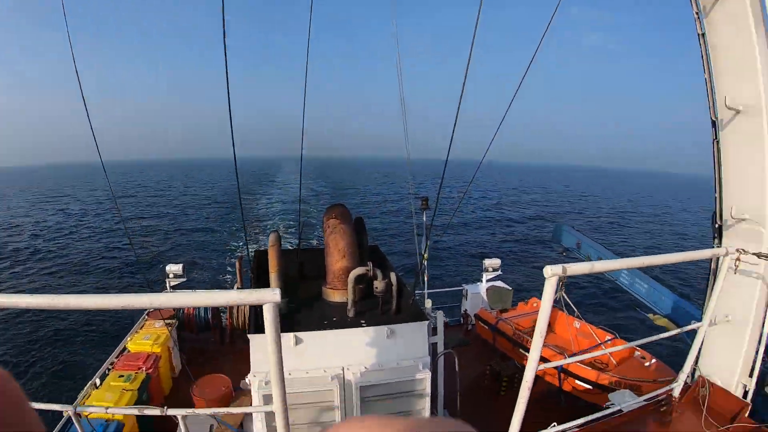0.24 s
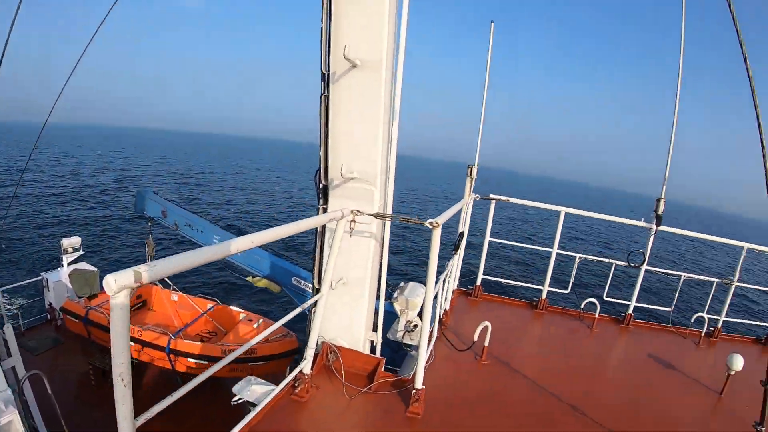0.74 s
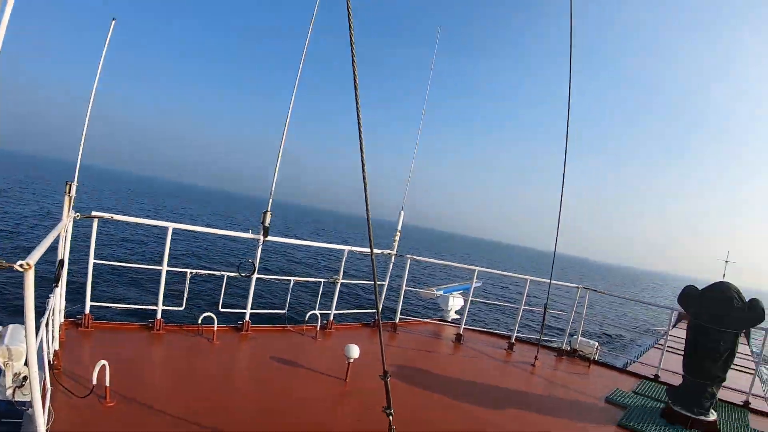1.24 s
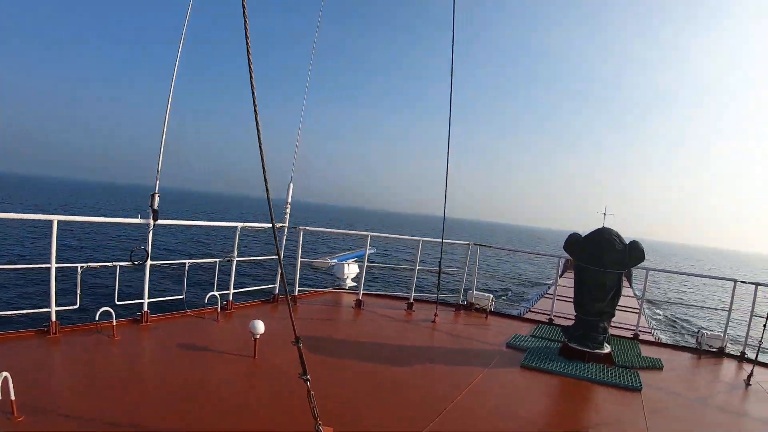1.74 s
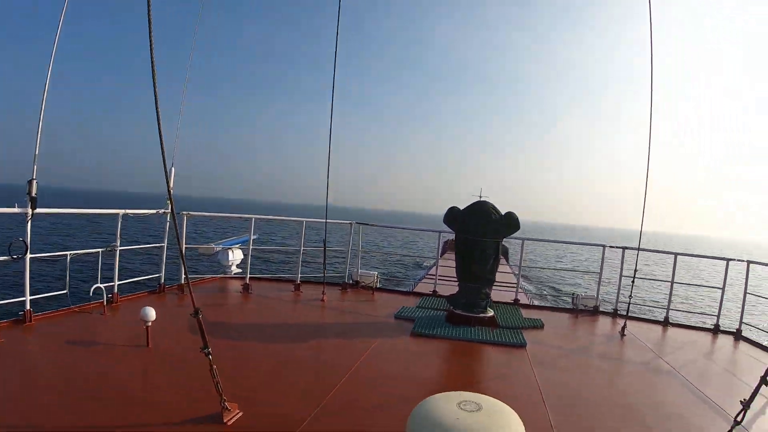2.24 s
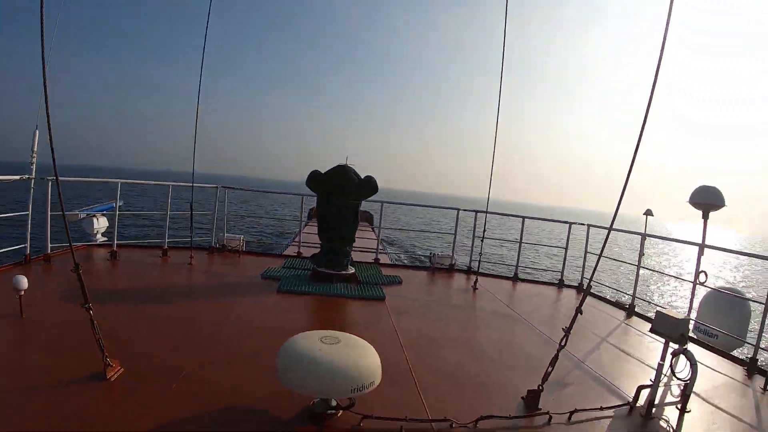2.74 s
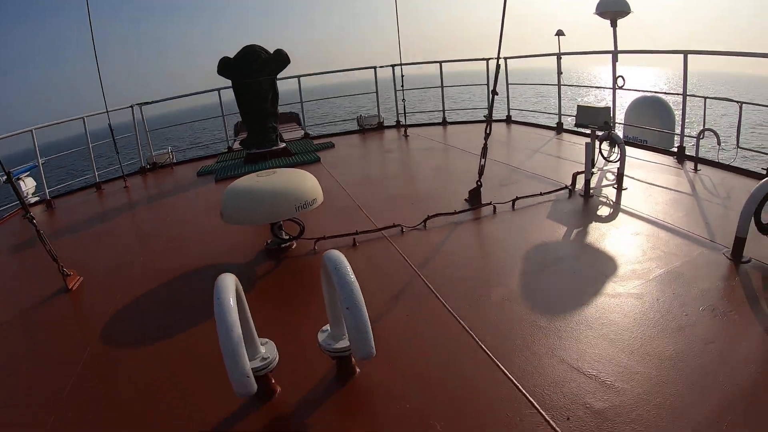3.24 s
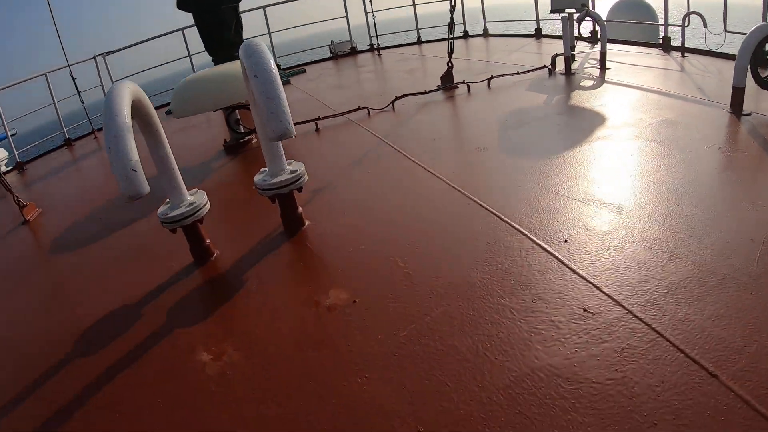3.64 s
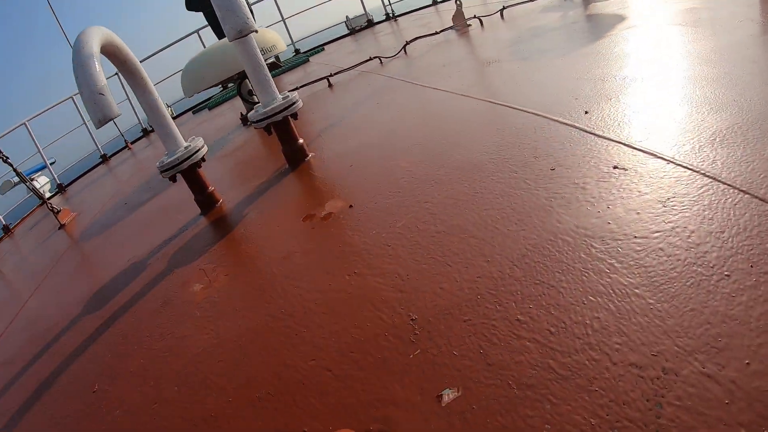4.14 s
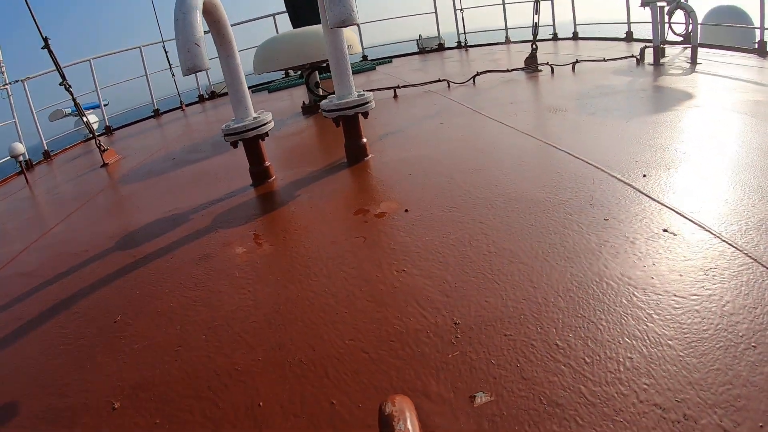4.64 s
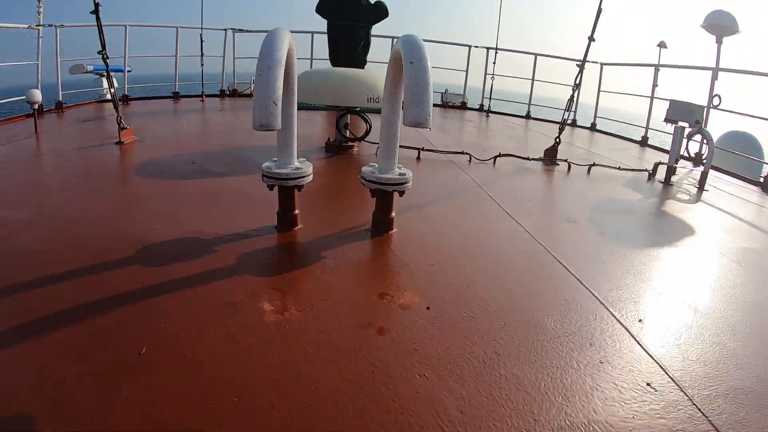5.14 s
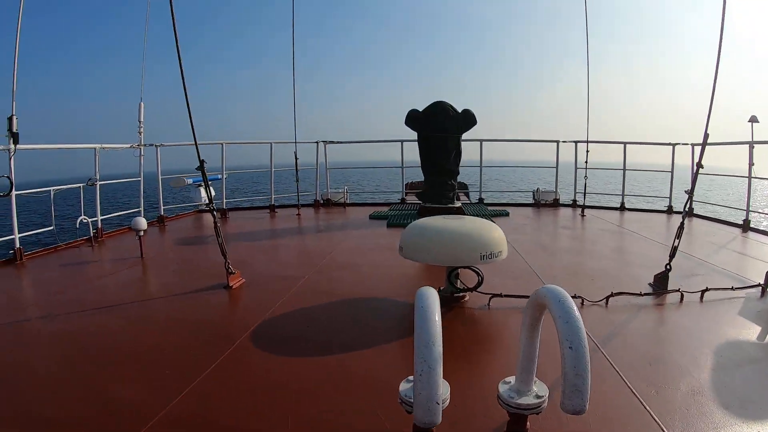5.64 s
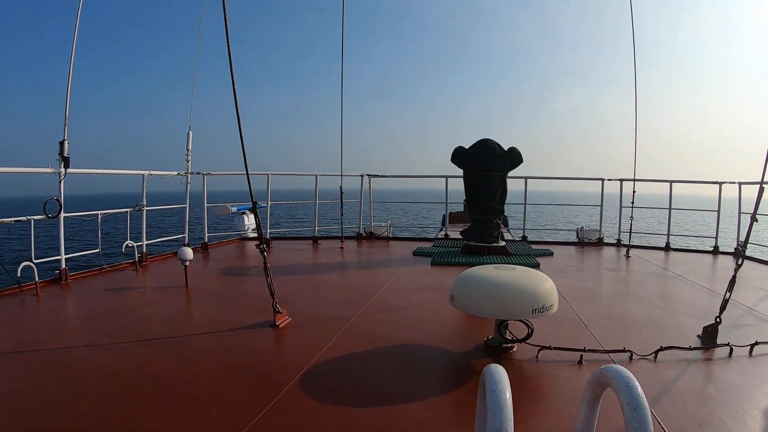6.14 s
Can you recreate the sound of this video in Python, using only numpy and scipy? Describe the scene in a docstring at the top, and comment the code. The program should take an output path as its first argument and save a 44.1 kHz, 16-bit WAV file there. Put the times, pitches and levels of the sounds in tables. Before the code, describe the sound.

On the open top deck of a ship, a slow diesel drones steadily over a low hull rumble. Fan roar and wake hiss start strong, then sink as the hand-held camera turns away from the funnel. Wind briefly buffets the microphone, later slaps it thickly, lets up to leave the engine alone, and returns until the end. Small plastic ticks come from the casing.

```python
"""Open top deck of a ship, heard from a hand-held camera that turns away from the funnel.
Throughout, a slow diesel drones as a comb of orders over hull rumble, fan roar and wake hiss; roar and hiss
start strong and sink. Gusts roll eddies and slaps over the microphone port, first briefly, then thickly
from 1.1 to 3 s; after a lull they return from 4.8 s to the end. The casing ticks in the hand near 2.4, 3.8
and 5.5-6.1 s. Orders are cosines, eddies and slaps pressure bumps, the rest shaped noise and knocks."""
import sys
import numpy as np
from scipy import signal
from scipy.fft import rfft, irfft
from scipy.io import wavfile
from scipy.ndimage import uniform_filter1d, minimum_filter1d

SR = 44100
rng = np.random.default_rng(int(sys.argv[2]) if len(sys.argv) > 2 else 0)


def master_out(mix):
    """Clip the mix to full scale and print it as 16-bit PCM to the path in sys.argv[1]."""
    frames = np.transpose(np.atleast_2d(mix))
    ceiling = np.clip(frames, -1, 1)
    pcm = np.round(ceiling * 32767).astype(np.int16)
    wavfile.write(sys.argv[1], SR, pcm)


N = 281799
T = np.arange(N) / SR


def undb(db):
    """Decibels to gain."""
    return 10 ** (np.asarray(db) / 20)


def unit(x):
    """Scale to rms 1."""
    return x / np.sqrt(np.mean(x ** 2))


def curves(table):
    """Columns of a table, joined by straight lines in time."""
    s, *columns = np.transpose(table)
    return [np.interp(T, s, c) for c in columns]


def lowpass(x, hz, order):
    """Zero-phase Butterworth low-pass."""
    return signal.sosfiltfilt(signal.butter(order, hz, fs=SR, output="sos"), x)


def band(x, lo_hz, hi_hz, order=2):
    """Butterworth band-pass."""
    return signal.sosfilt(signal.butter(order, [lo_hz, min(hi_hz, .45 * SR)], "band", fs=SR, output="sos"), x)


def coloured(spectrum):
    """Noise with a (Hz, dB) spectrum, near silent outside the table, rms 1."""
    hz, db = np.transpose(spectrum)
    f = np.maximum(np.arange(N // 2 + 1) * SR / N, 1)
    gain = undb(np.interp(np.log(f), np.log(hz), db, left=-120, right=-120))
    return unit(irfft(rfft(rng.standard_normal(N)) * gain, N))


def walk(rate_hz):
    """Random levels held 1 / rate_hz and slewed twice; rms 1."""
    k = int(SR / rate_hz)
    steps = np.repeat(rng.standard_normal(N // k + 1), k)
    return unit(uniform_filter1d(uniform_filter1d(steps, k), k)[:N])


def burst(lo_hz, hi_hz, envelope, strike=0):
    """Band noise under an envelope (or each row of envelopes) after an optional sharp strike, peak 1."""
    push = rng.standard_normal(envelope.shape) * envelope
    push = push + strike * (np.arange(envelope.shape[-1]) == 0)
    x = band(push, lo_hz, hi_hz, order=4)
    return x / np.abs(x).max(axis=-1, keepdims=True)


def add(out, s, x):
    """Mix x into out from time s."""
    i = int(s * SR)
    out[i:i + len(x)] += x[:N - i]


def engine(engine_db, boom_db, shade_db):
    """Orders of the cycle; uneven cylinders and the long funnel scatter their phases into an upward sweep."""
    # engine orders before the gain curves: order (multiple of the cycle rate), level_db [dB rms]
    orders = [(6, -35.6), (7, -27.7), (8, -48.4), (9, -41.1), (10, -43.6), (11, -28.6), (12, -39.5),
              (13, -36.2), (14, -33.0), (15, -40.1), (16, -33.0), (17, -27.9), (18, -34.8), (19, -30.9),
              (20, -41.1), (21, -32.6), (23, -38.7), (24, -34), (25, -38.7), (26, -39.2), (27, -44.3),
              (28, -31.6), (29, -34.6), (30, -44.9), (31, -41.2), (32, -39.5), (33, -47.7), (34, -45.7),
              (36, -50.8), (44, -50.8), (46, -47.8), (49, -50.4), (50, -42.6), (51, -48.9), (54, -49.2)]
    # steady tones of other machines, before the gain curve: pitch_hz [Hz], level_db [dB rms]
    auxiliary = [(76.31, -34.5), (354.4, -47.5)]
    cycle_hz, cycle_start_s = 7.029, .09
    boom_hz, boom_octaves, shade_hz = 137, .16, 165
    turn = 2 * np.pi * cycle_hz * (T - cycle_start_s)
    out = 0
    for k, db in orders:
        order_hz = k * cycle_hz
        boom = np.exp(-(np.log2(order_hz / boom_hz) / boom_octaves) ** 2)
        # moving air between funnel and deck makes each order waver, the high ones most
        waver_rad = .008 * k * walk(1.5)
        colour_db = boom * boom_db + (order_hz > shade_hz) * shade_db
        gain = undb(db + engine_db + colour_db + .8 * walk(2.5))
        stagger_rad = .4 * (k - 6.5) ** 2
        out = out + gain * np.cos(k * turn - stagger_rad + waver_rad)
    for hz, db in auxiliary:
        out = out + undb(db + engine_db) * np.cos(2 * np.pi * hz * T - 2.3)
    return np.sqrt(2) * out  # rms to peak


def eddy_levels():
    """Level curves in dB of middle, large and small eddies: breeze plus buffets (rise, sagging hold, fall)."""
    # light wind on the port: time_s [s], middle_db [dB]
    breeze = [(0, -38), (.3, -30.5), (.75, -33.5), (1.1, -33), (1.3, -32), (2.4, -30), (2.55, -35.5),
              (3.0, -31.5), (3.3, -44.5), (4.5, -56.5), (4.8, -32.5), (5.3, -32), (5.8, -31), (6.0, -34),
              (6.15, -33.5), (6.39, -34)]
    # buffets of wind: start_s [s], length_s [s], middle_db [dB], large_db, small_db [dB over middle]
    buffets = [(0.078, 0.066, -17, -3, -23.5), (0.146, 0.13, -24.5, 3.5, -24), (1.201, 0.029, -18, 5, -21),
               (1.283, 0.055, -24, 12, -23.5), (1.33, 0.042, -21, 12, -18), (1.408, 0.036, -38.5, 8.5, -19),
               (1.443, 0.044, -27.5, 15, -34), (1.585, 0.065, -25.5, 8.5, -37), (1.66, 0.046, -20, -5, -20),
               (1.708, 0.034, -25.5, 12.5, -31), (1.785, 0.084, -20.5, 0.5, -32),
               (1.894, 0.062, -25, -9, -23), (1.966, 0.045, -33, -17, -13), (2.041, 0.051, -21, 4, -27),
               (2.101, 0.03, -21, 5, -10.5), (2.137, 0.068, -22.5, 8, -34), (2.245, 0.016, -23, 3.5, -5),
               (2.275, 0.071, -20.5, 9.5, -17.5), (2.336, 0.013, -26, 0.5, -1),
               (2.349, 0.066, -22.5, -2, -18), (2.402, 0.044, -19.5, 4, -11.5),
               (2.444, 0.031, -25.5, 10, -25), (2.487, 0.0038, -18.5, -5.5, -6.5),
               (2.628, 0.042, -28, -2, -25), (2.699, 0.029, -26.5, 9.5, -30), (2.798, 0.13, -30, -12, -38),
               (2.956, 0.068, -28.5, 1, -22), (4.836, 0.064, -23, 4, -28), (4.944, 0.058, -20, 3.5, -23),
               (4.994, 0.069, -18, 4, -21), (5.148, 0.032, -19, 2.5, -21), (5.198, 0.034, -27, -1, -24),
               (5.348, 0.054, -27, 7, -18.5), (5.451, 0.032, -31, 12.5, -27),
               (5.513, 0.045, -18, 12.5, -31), (5.624, 0.01, -30, 7, -10), (5.668, 0.19, -28.5, 10, -32),
               (5.839, 0.07, -22, 13, -20), (5.898, .02, -25, 7.5, -5), (5.908, 0.021, -13.5, -3, -16),
               (6.038, 0.028, -20, 10, -9.5), (6.078, 0.016, -21.5, 1.5, -7)]
    rise_s, fall_s, sag_db = .007, .0095, -5.5
    breeze_large_db, breeze_small_db = 6.5, -28  # over the middle eddies
    breeze_db = curves(breeze)[0] + np.array([[0], [breeze_large_db], [breeze_small_db]])
    power = undb(2 * breeze_db)
    for s, length_s, db, large_db, small_db in buffets:
        end_s = s + length_s
        near = slice(int((s - rise_s) * SR), int((end_s + fall_s) * SR))
        corners_s = [s - rise_s, s, end_s, end_s + fall_s]
        shape_db = np.interp(T[near], corners_s, [-30, 0, sag_db, sag_db - 30.5])
        power[:, near] += undb(2 * (db + shape_db + np.array([[0], [large_db], [small_db]])))
    return 10 * np.log10(power)


def wind(family_db):
    """Eddies of several sizes pass the port as single smooth pressure bumps."""
    # eddy sizes: centre_hz [Hz], level_db [dB over family], family [0 middle, 1 large, 2 small]
    eddies = [(42, -11, 1), (74.7, -6, 1), (140.5, -6, 1), (267.6, 0.6, 0), (514, -11.5, 0), (945, -3.5, 2),
              (1700, -24.5, 2)]
    rate_per_s, scatter_db, flutter_db, port_hz = 420, 1.2, 2.06, 30.7
    # below a threshold speed the flow stays attached and the port is quiet
    attached_db = -1.5 * np.maximum(-33 - family_db[0], 0)
    common = undb(attached_db + flutter_db * walk(45))
    # a breaking eddy strikes at all sizes at once; the rest of each size comes by itself
    breaking = (rng.random(N) < rate_per_s / SR) * rng.standard_normal(N)
    breaking = breaking * undb(scatter_db * rng.exponential(size=N))
    out = 0
    for hz, db, family in eddies:
        bumps = breaking + (rng.random(N) < rate_per_s / SR) * rng.standard_normal(N)
        gain = common * undb(db + family_db[family])
        # the bumps are symmetric in time, so large eddies peak with the small ones
        size = signal.butter(2, [hz / 1.4, hz * 1.4], "band", fs=SR, output="sos")
        level = np.std(signal.sosfiltfilt(size, bumps[:N // 2]))
        out = out + signal.sosfiltfilt(size, bumps * gain) / level
    return signal.sosfilt(signal.butter(4, port_hz, "high", fs=SR, output="sos"), out)


def slaps(wind_db):
    """Pressure jolts: thump, edge and crackle strike together, with a ragged wake; weak ones come at random."""
    # sharp slaps of air on the port: start_s [s], level_db [dB], crackle_db, thump_db [dB over level]
    strong = [(0.079, -20.5, -23, 13), (0.116, -20.5, -36, 10.5), (0.155, -21, -32, 1),
              (0.222, -24.5, -33, 15), (0.247, -26.5, -27, 15), (0.44, -33, -27, 2),
              (0.512, -31, -23, 19.5), (1.091, -30.5, -34, 18), (1.2, -13, -35, 2.5), (1.218, -26, -32, 9),
              (1.274, -19, -28.5, 11), (1.334, -33, -22.5, 5), (1.359, -22.5, -24, 16),
              (1.421, -27, -27, 9.5), (1.454, -20.5, -27, 11.5), (1.483, -26, -23, 14),
              (1.5, -25.5, -32, 12.5), (1.531, -18.5, -31, 6), (1.59, -17, -46.5, 3.5), (1.61, -28, -30, 6),
              (1.635, -18.5, -35, 6), (1.642, -27, -33, 4), (1.655, -18, -22, 5), (1.666, -22, -30, 1),
              (1.68, -11.5, -31, 7.5), (1.689, -24, -23, 9), (1.788, -20, -33, 6), (1.809, -14, -42, 2.5),
              (1.832, -24, -28, 6), (1.847, -19.5, -32, 11), (1.862, -25.5, -35, 19),
              (1.903, -25, -24, 14.5), (1.915, -24.5, -30, 9), (1.977, -27.5, -34, 17),
              (1.994, -23.5, -30, 10), (2.04, -29, -26, 17), (2.066, -24, -39, 17), (2.081, -27.5, -34, 10),
              (2.095, -26, -33, 22), (2.162, -24, -39, 16), (2.241, -19, -12, -3), (2.2485, -9.5, -15.5, 3),
              (2.255, -25, -11, -6), (2.261, -17.5, -15, -1), (2.276, -18, -25, 11),
              (2.307, -17.5, -26, -2), (2.338, -12, -18.5, 2.5), (2.342, -21, -14, 2),
              (2.345, -21, -9, -1.5), (2.361, -21, -20, 6), (2.376, -20, -18, 14), (2.381, -21, -22.5, 3),
              (2.404, -16.5, -17, 2), (2.418, -25, -22, 2), (2.431, -18, -21, 2), (2.488, -16.5, -12, 3),
              (2.624, -26, -36, 6), (2.647, -23, -28, -5), (2.708, -40, -35, 10), (2.734, -17.5, -45, 5.5),
              (2.827, -28.5, -29, 16.5), (2.843, -27.5, -38, 12), (2.865, -38, -31, 5),
              (2.907, -26, -35.5, 13.5), (2.916, -30, -28, 16.5), (2.997, -21, -34, 13.5),
              (3.762, -27.5, -25, -3), (4.947, -21, -38, 14.5), (4.961, -24, -32, 6),
              (4.976, -22.5, -38, 4), (4.996, -24, -36, 9), (5.006, -11.5, -29, 3.5), (5.032, -19, -39, 6),
              (5.159, -21.5, -32, -4), (5.171, -23, -24.5, -1), (5.184, -22, -29, 9),
              (5.215, -24, -29, 15.5), (5.256, -20, -34, 3), (5.287, -34, -27, 4), (5.363, -25.5, -35, 9),
              (5.454, -28.5, -26, 2), (5.481, -31, -21, 12), (5.519, -14, -19.5, 3), (5.53, -17, -27, 14),
              (5.544, -22.5, -35, 12.5), (5.628, -27, -30, 14), (5.634, -20, -4.5, 10),
              (5.843, -25.5, -30, 9), (5.858, -17.5, -25, 7), (5.866, -25, -20, 8), (5.878, -13, -22, 1),
              (5.899, -14, -19, -7), (5.913, -16, -6, 8), (5.92, -11.5, -12, 6), (6.042, -26, -22, 12),
              (6.048, -18.5, -25, 9), (6.052, -26, -28, 7), (6.071, -25, -38, 16), (6.086, -17, -26, -3),
              (6.092, -26, -26, 7), (6.268, -29, -32, 14), (6.37, -33, -25, 14)]
    weak_per_s, weak_db, weak_crackle_db, weak_thump_db = 25, -9, -28.5, 9  # weak_db over the wind
    lag_s, ragged_db = .002512, -9.5
    out, t = np.zeros(N), np.arange(1024) / SR - .006
    gap, size = rng.exponential(size=(400, 2)).T
    times = np.cumsum(gap) / weak_per_s
    weak = [(s, wind_db[int(s * SR)] + weak_db - 5 * e, weak_crackle_db, weak_thump_db)
            for s, e in zip(times, size) if .01 < s < T[-1]]
    s, db, crackle_db, thump_db = np.array(list(strong) + weak).T[:, :, None]
    skew, pitch = rng.standard_normal((len(s), 2)).T[:, :, None]

    def part(hz, half_length_s):
        """Cosine under a bell, its pitch and phase varied per slap."""
        wave = np.cos(2 * np.pi * hz * (1 + .08 * pitch) * t + .53 * skew)
        return wave * np.exp(-(t / half_length_s) ** 2)

    jolts = .77 * undb(thump_db) * part(318, .0014415)
    jolts = jolts + .61 * part(696, .001302)  # edge
    jolts = jolts + .32 * undb(crackle_db / 2) * part(1480, .00093)  # bite
    jolts = jolts + undb(crackle_db) * part(1850, .0004371)
    wake = np.ones_like(s) * (t > 0) * np.exp(-t / .0029)
    jolts = jolts + undb(ragged_db) * burst(300, 1100, wake)
    for start_s, jolt in zip(s[:, 0], undb(db) * jolts):
        add(out, start_s + lag_s + t[0], jolt)
    return out


def clicks():
    """The plastic casing creaks under the fingers: a dry click, a short hollow knock, a faint rattling tail."""
    # casing clicks: start_s [s], level_db [dB], treble_db, top_db [dB over level], decay_s [s to -60 dB],
    # tail_db [dB over click envelope], knock_hz [Hz], knock_db [dB over level]
    ticks = [(2.2428, -44, -13, -40, .006, -23, 2300, 5), (2.2772, -44.5, -14, -37, .006, -24, 2300, 2),
             (2.3102, -48, -17, -36, .006, -28, 2300, 5), (2.43, -50, -25, -45, .006, -27, 1700, 18),
             (2.4898, -32.5, -11, -42, 0.0074, -11.5, 1600, 5),
             (3.7628, -32.5, 0, -12, 0.01, -12, 2500, -12), (3.765, -34.5, -9, -18, 0.015, -11, 2500, -16),
             (3.7777, -41, -7, -16, .01, -15, 2500, -11), (3.917, -42, -5, -40.5, .011, -23, 2500, -11),
             (5.5203, -43.5, -15, -41, .006, -26, 1700, 18), (5.6354, -38, -19, -43, .006, -21, 1750, 11),
             (5.8748, -44, -7, -34, .006, -24, 2600, -6), (5.8795, -48, -20, -40, .006, -25, 2300, 11.5),
             (5.893, -29, -11, -29, .009, -16, 2500, -4), (5.9002, -38, -19, -35, .008, -24, 1800, -1),
             (5.9148, -24, -7, -40, 0.0069, -27.5, 2200, 8),
             (5.9216, -17.5, -9.5, -40, 0.006, -37, 1100, 3),
             (6.0418, -52, -30.5, -43, .008, -25, 1500, 27.5),
             (6.046, -52, -30, -44, .008, -24.5, 1350, 25), (6.086, -55, -32, -45, .008, -25, 1600, 24)]
    strike, tail_t60_s, knock_t60_s, knock_rise_s = 4, .11, .011, .00036
    out, t = np.zeros(N), np.arange(4096) / SR

    def decay(t60_s):
        """Exponential fall by 60 dB in t60_s."""
        return np.exp(-np.log(1000) * t / t60_s)

    for s, db, treble_db, top_db, t60_s, tail_db, knock_hz, knock_db in ticks:
        shape = decay(t60_s) + undb(tail_db) * decay(tail_t60_s)
        treble = burst(3000, 5600, shape, strike) + .16 * burst(6000, 8600, shape, strike)
        knock = np.sin(2 * np.pi * knock_hz * t) * decay(knock_t60_s) * (1 - np.exp(-t / knock_rise_s))
        click = burst(830, 3200, shape, strike) + undb(knock_db) * knock + undb(treble_db) * treble
        click = click + undb(top_db) * burst(10000, 15500, shape, strike)
        add(out, s, undb(db) * click)
    return out


def ventilation(vent_db, low_db, top_db):
    """Fan roar: coloured noise that breathes a little, its low and top parts lifted or cut."""
    # fan roar spectrum: pitch_hz [Hz], level_db [relative dB per Hz]
    spectrum = [(330, -17.5), (420, 3.5), (600, -3), (800, -3), (1100, -10), (2000, -18), (3000, -25),
                (3600, -52)]
    roar = coloured(spectrum)
    roar = roar / np.std(band(roar, 900, 2800, order=4))
    roar = roar + (undb(low_db) - 1) * lowpass(roar, 1000, 2)
    top = signal.sosfiltfilt(signal.butter(4, 2000, "high", fs=SR, output="sos"), roar)
    roar = roar + (undb(top_db) - 1) * top
    return roar * undb(vent_db + .5 * walk(8.9))


def wake_hiss(wake_db):
    """Wake hiss and a faint airy top that follows it more steeply; both breathe a little."""
    # wake hiss spectrum: pitch_hz [Hz], level_db [relative dB per Hz]
    wake = [(900, -6.5), (1500, -2.5), (2500, -8), (3200, 3.5), (5500, 0), (7600, -9.5), (8600, -26)]
    # airy top spectrum: pitch_hz [Hz], level_db [relative dB per Hz]
    air = [(7000, 0.5), (8200, -5.5), (10500, -9), (12500, -5.5), (15000, -14.5), (16000, -4.5)]
    air_db = -78 + 1.5 * (wake_db + 66)
    hiss = coloured(wake) * undb(wake_db + 1.2 * walk(3.2))
    return hiss + coloured(air) * undb(air_db + .4 * walk(11))


def hull(engine_db):
    """Rumble of the hull plates that follows the engine: low strands that swell each by itself."""
    # hull rumble spectrum: pitch_hz [Hz], level_db [relative dB per Hz]
    spectrum = [(28, -29), (45, -10), (120, -4.5), (200, -13), (250, -16), (290, -14.5), (330, -18),
                (375, -19), (400, -27), (520, -37)]
    hull_db, swell_db = -29, 1.8
    rumble = coloured(spectrum)
    below = [0] + [lowpass(rumble, hz, 3) for hz in (95, 165, 260)] + [rumble]
    strands = [(upper - lower) * undb(swell_db * walk(5)) for lower, upper in zip(below, below[1:])]
    return unit(sum(strands)) * undb(hull_db + engine_db)


def scene():
    """All sources at the single microphone."""
    # steady sounds as the camera turns: time_s [s], wake_db, vent_db [dB], engine_db [dB gain],
    # low_db [dB, low roar over roar], boom_db [dB gain, engine boom],
    # shade_db [dB gain, upper engine orders], top_db [dB gain, top of the roar]
    facing = [(.05, -58, -41, 4, -15, -1, -9.5, -5), (.22, -61.5, -49.5, 0, -4, 7.5, -1.5, -8),
              (.45, -61.5, -46, 0, -8.5, 1.5, -1.5, -7.5), (.7, -61.5, -46.5, 0.3, -14.5, 3, -2, -2.5),
              (1.0, -62, -49, -1.5, -7, -2.5, -1, -1.5), (1.22, -63, -51, -0.9, 1.5, 7, 3.5, 0.5),
              (1.4, -65.5, -55.5, -1.5, -5.5, 3, -11, 1.8), (2.2, -68.5, -54, -4.5, 0, 5.5, -2.5, -2),
              (2.54, -66.5, -54.5, -2, -0.5, -0.5, -4, -0.5), (2.98, -67, -55, -1.5, 4.5, -0.2, -1.5, .1),
              (3.3, -65.5, -53.5, -2, -1, -1.2, 0.8, -0.5), (3.69, -67, -56, 0, 6, -3, -0.8, -0.5),
              (4.2, -65, -53.5, 0.5, 3.5, 0.8, 1.7, .1), (4.8, -65.5, -54, 4, 6, -3.4, -0.5, 0.3),
              (5.2, -66.5, -53, -0.5, -4.5, 1.7, 0.4, 0.3), (6.05, -67.5, -55, -2.5, -3.5, 0.5, -1.8, 0.5),
              (6.39, -66, -55.5, -3.5, -2, 6.5, -2.5, .1)]
    wake_db, vent_db, engine_db, low_db, boom_db, shade_db, top_db = curves(facing)
    eddies_db = eddy_levels()
    out = engine(engine_db, boom_db, shade_db)
    out = out + wind(eddies_db) + slaps(eddies_db[0]) + clicks()
    out = out + ventilation(vent_db, low_db, top_db) + wake_hiss(wake_db) + hull(engine_db)
    return out[None]


def record(dry):
    """A look-ahead limiter holds the peaks; the camera cuts the top."""
    ceiling, window, top_hz = .7, 441, 15760  # window in samples, 10 ms
    gain = np.minimum(1, ceiling / (np.abs(dry) + 1e-9))
    gain = uniform_filter1d(minimum_filter1d(gain, size=window), size=window)
    return signal.sosfilt(signal.ellip(10, .2, 70, top_hz, fs=SR, output="sos"), dry * gain)


dry = scene()
out = record(dry)
master_out(out)
```